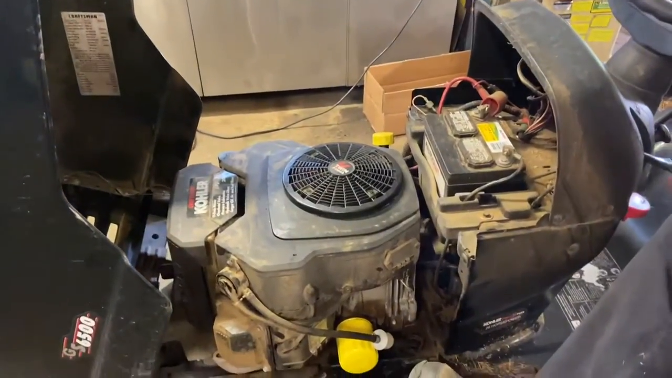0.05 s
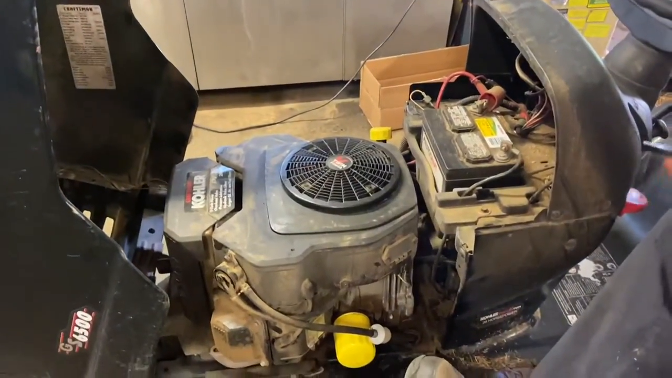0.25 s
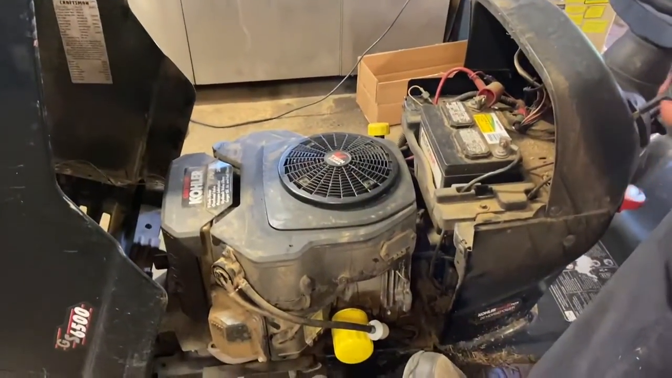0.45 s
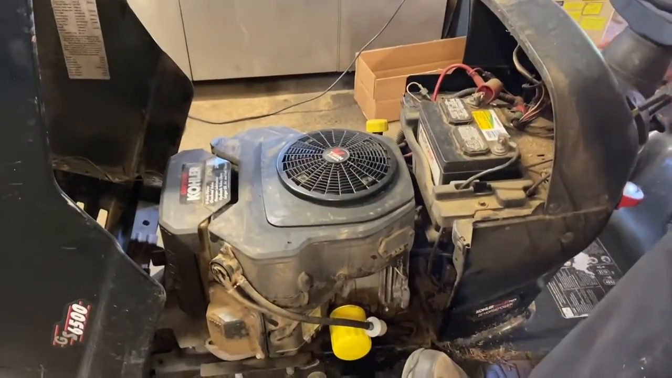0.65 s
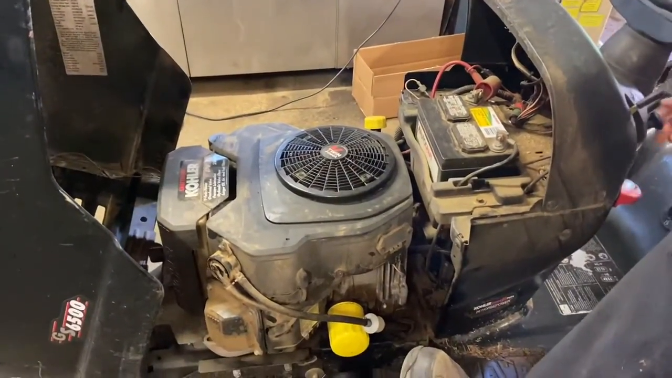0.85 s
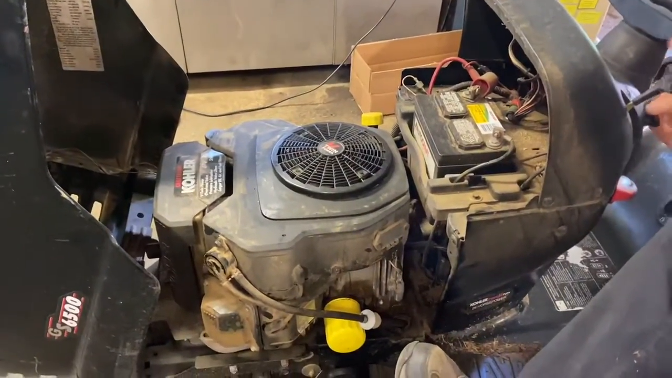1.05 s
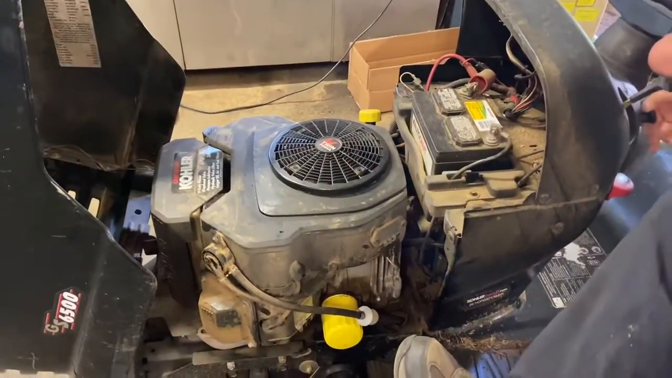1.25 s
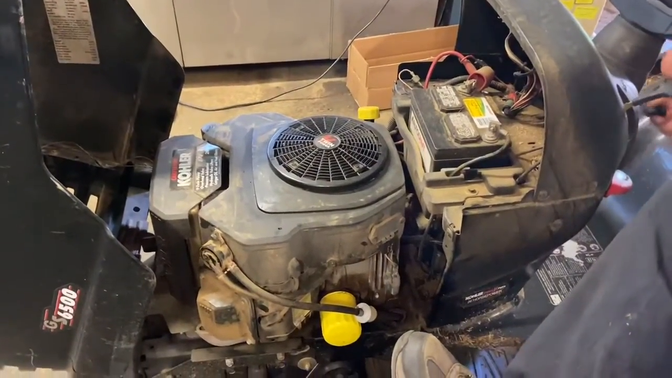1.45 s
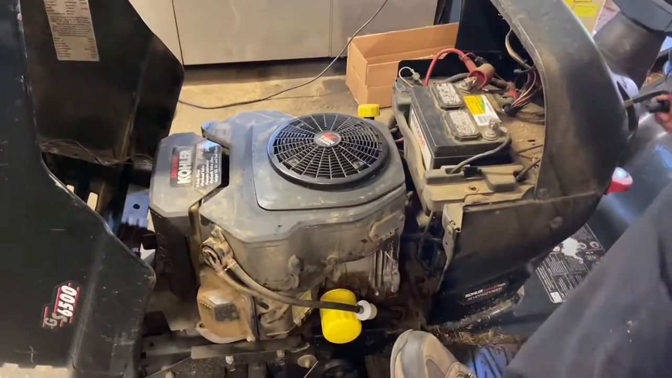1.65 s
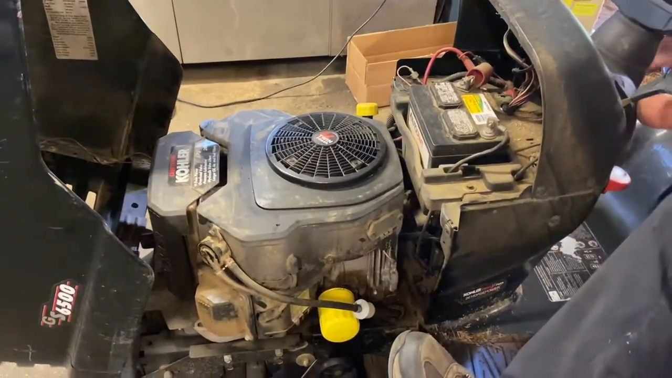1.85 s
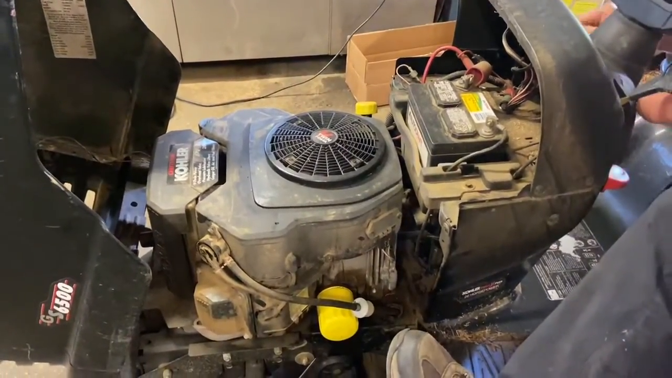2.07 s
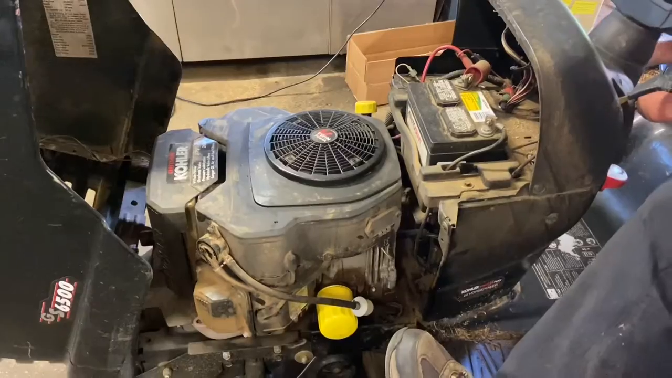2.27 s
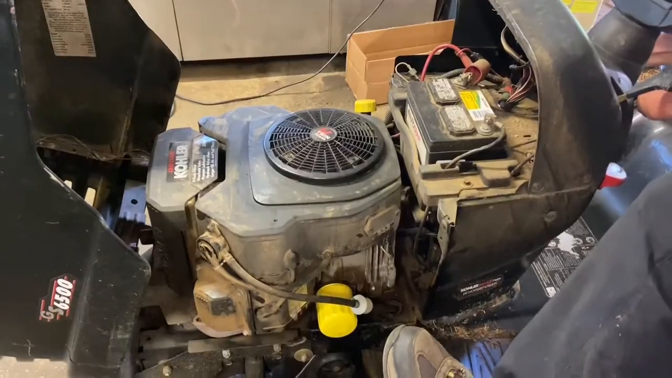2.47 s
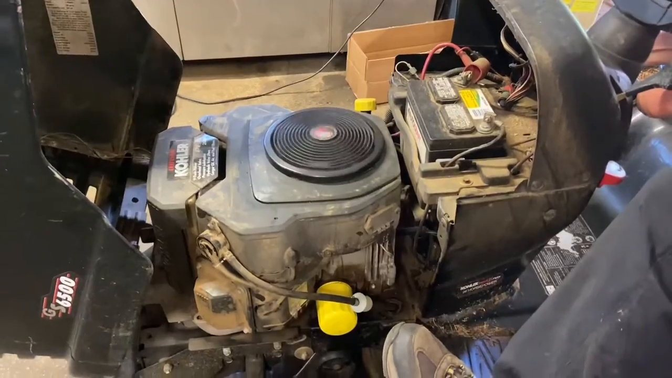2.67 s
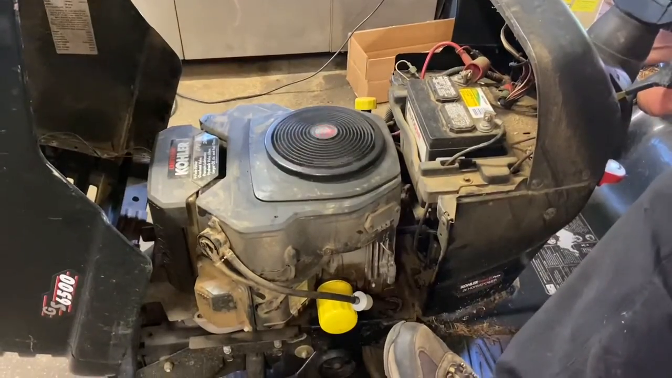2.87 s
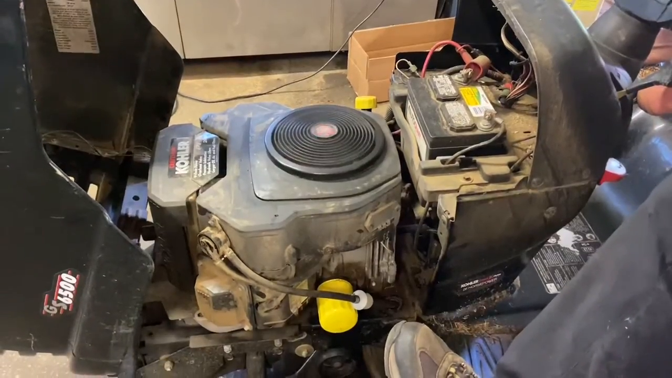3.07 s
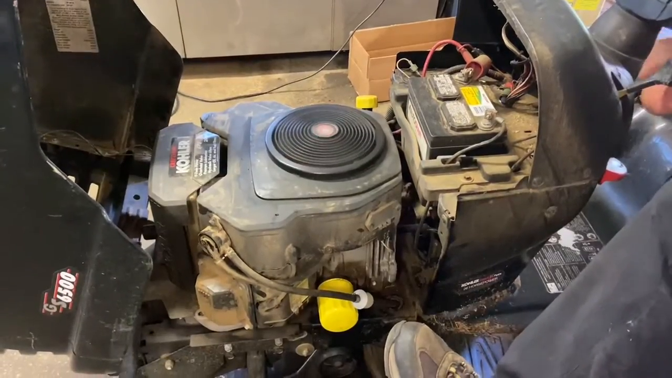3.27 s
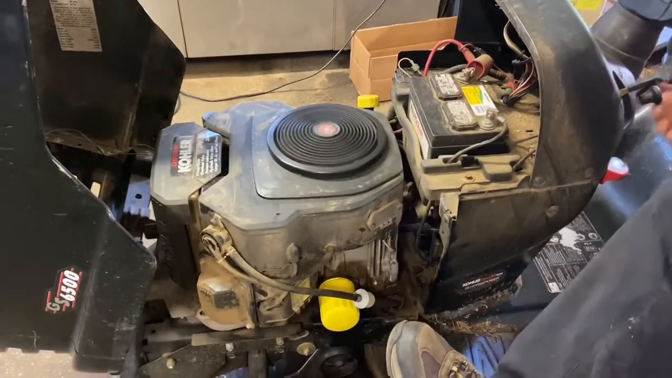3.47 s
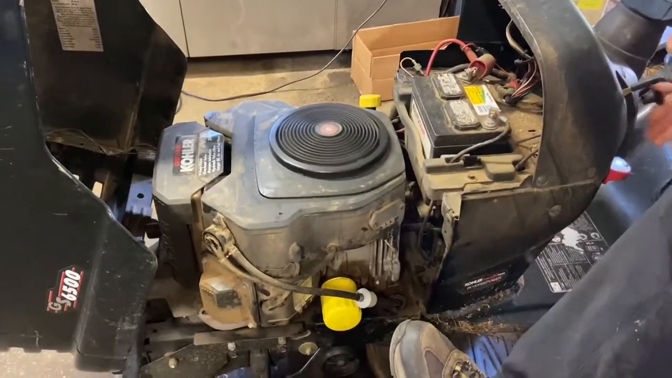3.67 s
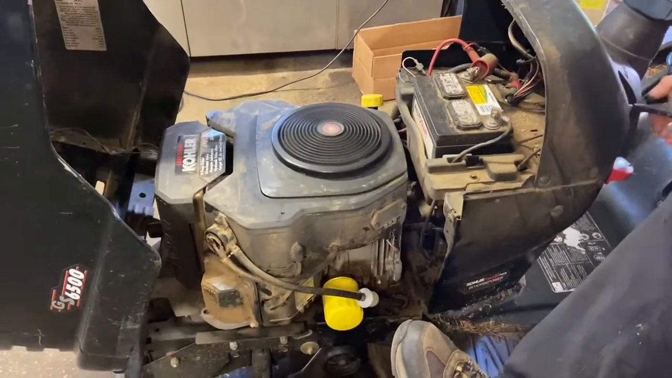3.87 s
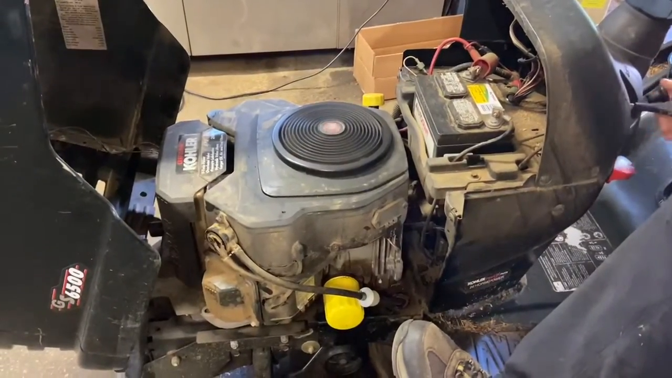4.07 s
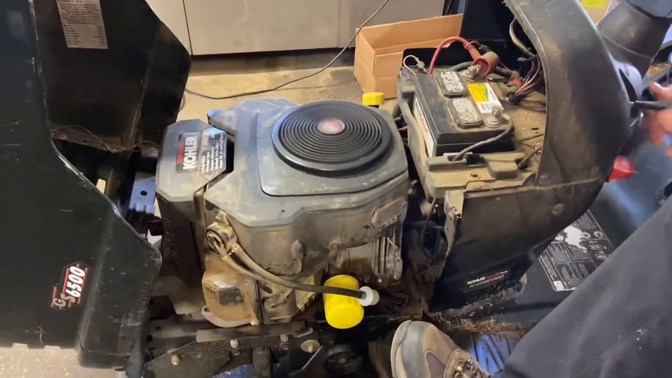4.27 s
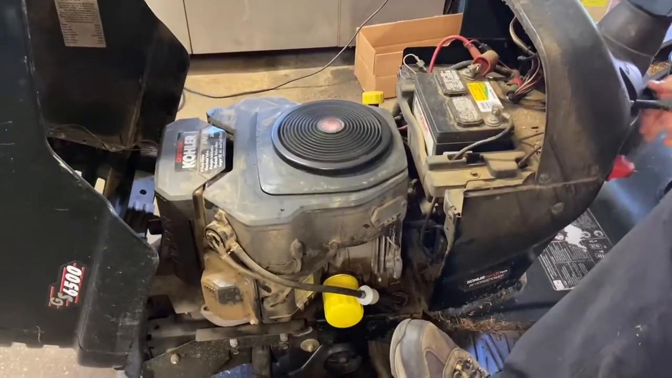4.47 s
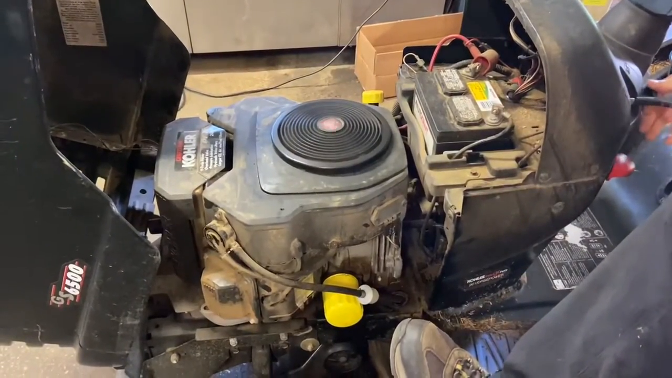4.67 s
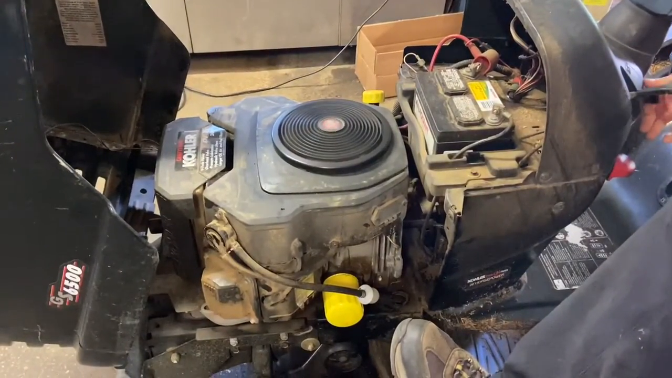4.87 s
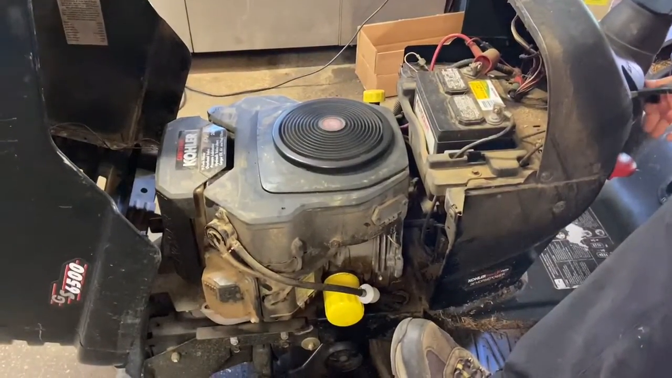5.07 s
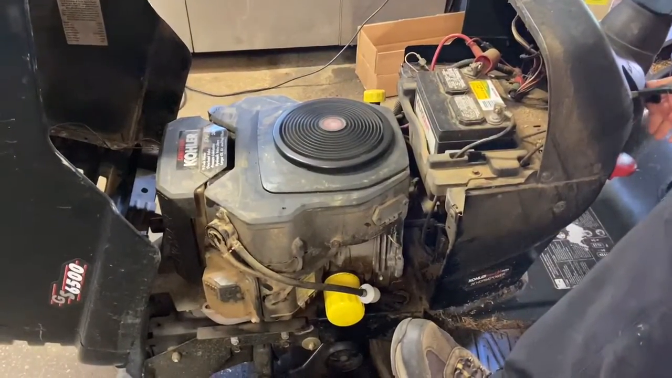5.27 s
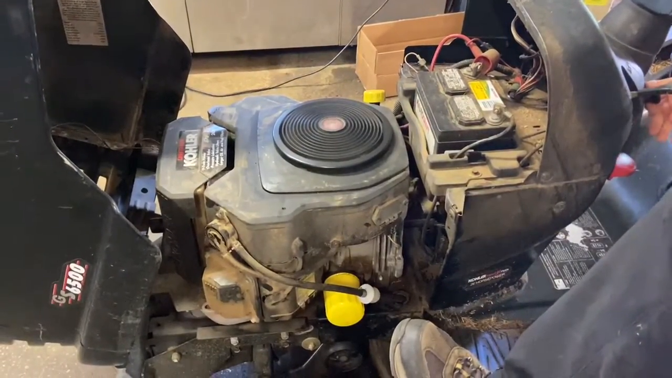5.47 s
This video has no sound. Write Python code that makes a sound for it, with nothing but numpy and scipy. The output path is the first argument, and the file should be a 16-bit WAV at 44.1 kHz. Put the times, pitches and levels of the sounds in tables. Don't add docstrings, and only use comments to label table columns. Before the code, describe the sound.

Stereo pickup a metre from a lawn tractor engine indoors. Pedal and key knocks come first over quiet room hum, then a violent clunk and harsh, heaving starter grind. The engine fires with a low howl and boom, backfires in a ragged burst, slows to dull puffs, then pops again and picks up to a fast uneven throb with rattling panels and hissing gas until the end.

```python
import sys
import numpy as np
from scipy import signal
from scipy.fft import rfft, irfft, next_fast_len
from scipy.io import wavfile
from scipy.ndimage import uniform_filter1d

SR = 44100
rng = np.random.default_rng(int(sys.argv[2]) if len(sys.argv) > 2 else 0)


def transcribe(signal):
    frames = np.atleast_2d(signal).T
    limited = np.clip(frames, -1, 1)
    pcm = np.round(limited * 32767).astype(np.int16)
    wavfile.write(sys.argv[1], SR, pcm)


def makeup_ratio(level_db):
    decades = np.asarray(level_db, float) / 20
    return 10 ** decades


N = 243431
T, M = np.arange(N) / SR, next_fast_len(N, True)
F = np.arange(M // 2 + 1) * SR / M

LEAD = .371
# (time [s], burn level [dB], labouring in the long pipe [dB])
EFFORT = [(2.92, -26, -39), (2.99, -25, -32), (3.17, -21.5, -36), (3.25, -23, -26), (3.4, -27, -30),
          (3.47, -28.5, -32), (3.71, -26.5, -19.5), (3.82, -26, -31), (4.05, -28.5, -36), (4.36, -33, -37),
          (4.55, -39, -31), (4.6, -25, -23.5), (4.72, -22, -26), (4.82, -18.5, -31), (4.92, -18.5, -42),
          (5.52, -17.5, -32)]
# (frequency [Hz], density [dB per Hz])
CLATTER = [(180, -3), (300, -6), (352, -13), (429, -13.5), (528, -8), (761, -7.5), (994, -9.5), (1330, -9),
           (2310, -14), (3200, -24.5), (4160, -25), (7040, -120)]
# (frequency [Hz], density [dB per Hz])
RUSH = [(2500, -25), (3200, -1.5), (5000, 3.5), (7000, 3), (9000, 3.5), (12000, 1.5), (15600, 2),
        (16000, -52)]


def engine():
    first_db, cold_db = -1, -2.5
    strokes = firings(first_db + cold_db * ((T > 3.2) & (T < 3.7)))
    puff = steady(fade_out(uniform_filter1d(strokes, SR // 60), 0.0021), 0.043)
    thumps, cracks = backfires()
    tailpipe = exhaust(strokes) + thumps
    block = chuffs() + cracks + howl(puff) + belt_whistle() + valve_train(puff)
    return tailpipe, block


def crank():
    # (time [s], position [cycles])
    crankshaft = [(2.40, -4.6), (2.693, -2.4), (2.976, 0), (3.061, 1), (3.186, 3), (3.289, 5), (3.701, 13),
                  (3.929, 17), (4.057, 19), (4.198, 21), (4.357, 23), (4.540, 25), (4.631, 26), (4.707, 27),
                  (4.823, 29), (4.9327, 31), (5.3215, 38), (5.706, 45)]
    cycles = np.interp(np.arange(N + SR // 8) / SR + .0015, *np.transpose(crankshaft))
    return uniform_filter1d(uniform_filter1d(cycles, SR // 16), SR // 16)[:N]


def firings(first_db):
    cycles = crank()
    scatter = makeup_ratio(.9 * rng.standard_normal(N))

    def stroke(lead):
        return np.diff(np.floor(cycles + lead), prepend=np.floor(cycles[0] + lead))

    return scatter * (stroke(0) + makeup_ratio(first_db) * stroke(LEAD))


def exhaust(strokes):
    # (frequency [Hz], width [Hz], gain [dB])
    boom_modes = [(58.5, 1.6, 25), (73.4, 32, 4), (83.3, 66, -15.5)]
    gate, burn_db, labour_db = curves(EFFORT, 0.017)
    echo = strokes + 0.48 * np.roll(strokes, int(0.027 * SR))
    echo = echo - .8 * np.roll(echo, SR // 300)
    boom = .45 * steady(band(ring(echo, boom_modes), 45, 96), .15)
    boom = boom + 1.15 * ring(drone(), [(76, 45, 0)])
    hot = makeup_ratio(0.9 * np.minimum(burn_db + 21, 0))
    beat = steady(pipe(np.roll(strokes, -int(.003 * SR)), hot), .25)
    soft = steady(band(strokes - np.roll(strokes, SR // 200), 84, 153), 0.078)
    soft_db = -14 - 1.23 * (burn_db + 22.5)
    return gate * (makeup_ratio(burn_db) * (makeup_ratio(1.5) * beat + makeup_ratio(soft_db) * soft) + makeup_ratio(labour_db) * boom)


def pipe(x, hot):
    # (frequency [Hz], width [Hz], gain [dB], sign [+1 or -1])
    chambers = [(72.4, 63, -14.8, 1), (82.6, 85, -14, -1), (93, 8, -23.6, 1), (165.8, 8, -23.4, 1),
                (222, 87, -26.4, 1), (256.5, 16, -25.8, -1), (290, 14, -38, 1), (326, 14, -35, -1)]
    out = 0
    for hz, width, db, sign in chambers:
        load = hot if 150 < hz < 230 else 1
        out = out + sign * load * ring(x, [(hz, width, db)])
    return out


def drone():
    # (order of the cycle [1], level [dB])
    orders = [(3, -10), (5, 0), (8, -14)]
    turn = 2 * np.pi * crank()
    lead = 2 * np.pi * LEAD
    return unit(sum(makeup_ratio(db) * (np.sin(round(k) * turn) + np.sin(round(k) * (turn + lead))) for k, db in orders))


def backfires():
    # (time [s], crack level [dB], thump level [dB])
    pops = [(3.2500, -14.5, -34), (3.2815, -14, -11.5), (3.3325, -13, -11), (3.3650, -13.5, -15),
            (3.3847, -14.5, -8), (3.4350, -44, -20), (3.4845, -9, -5), (3.5390, -25, -15),
            (3.5925, -12, -8), (3.6405, -10, -6), (3.6955, -11.5, -8), (4.5802, -24.5, -22),
            (4.615, -16, -27), (4.6644, -16, -39), (4.6870, -17.5, -28), (4.6975, -17, -13),
            (4.7550, -16.5, -24), (4.7960, -16.5, -23)]
    crack = impulses(pops, column=1)
    blow = np.roll(impulses(pops, column=2), int(.0035 * SR))
    swell = fade_out(uniform_filter1d(crack, SR // 160), 0.013)
    cracks = 0.34 * swell * (1.15 * noise(RUSH) + 1.44 * noise(CLATTER))
    thumps = 2600 * (pipe(blow, 0.45) - ring(blow, [(250, 17, -31)]))
    return thumps, cracks


def chuffs():
    # (time [s], level [dB])
    charges = [
        (2.685, -3),
        (2.792, -2),
        (2.922, -11),
    ]
    return band(ring(impulses(charges, column=1), [(73, 24, 31.6)]), 45, 144)


def valve_train(puff):
    # (frequency [Hz], width [Hz], gain [dB])
    shroud = [(428, 48, 9.5), (1335, 41, 9.5), (1657, 63, 4), (890, 84, 0.5), (1900, 120, -2),
              (2230, 470, -8.5)]
    valves = [(1, .2, .1), (4, .25, .3)]
    gate, burn_db, _ = curves(EFFORT, 0.017)
    cycles = crank()
    over = burn_db + 27
    octaves = np.log2(np.gradient(cycles) * SR / 18)
    clatter_db = -26.5 + 0.32 * over + 3.5 * octaves
    rush_db = -39 + 0.47 * over + 6 * octaves
    taps = unit(sum(makeup_ratio(3.8 * walk(14)) * ring(clicks(350, 2.3), [panel]) for panel in shroud))
    throb = 1 + sum(depth * np.cos(2 * np.pi * order * (cycles - place)) for order, depth, place in valves)
    clatter = unit(throb * (1 + 0.017 * puff) * makeup_ratio(0.31 * walk(25.12)) * (noise(CLATTER) + 0.63 * taps))
    rush = unit((1 + 0.5 * puff) * makeup_ratio(1.5 * walk(30)) * noise(RUSH))
    return gate * (makeup_ratio(clatter_db) * clatter + makeup_ratio(rush_db) * rush)


def howl(puff):
    # (time [s], pitch [Hz], level [dB])
    howl_catch = [(2.91, 165, -40), (2.935, 165, -22), (2.965, 200, -28), (3.0, 240, -29), (3.07, 238, -30),
                  (3.115, 250, -21), (3.17, 230, -29), (3.28, 252, -25), (3.33, 250, -40)]
    howl_recovery = [(4.58, 228, -43), (4.63, 230, -28), (4.665, 231.5, -23.5), (4.70, 237, -18),
                     (4.735, 250, -25), (4.76, 264, -26), (4.80, 272, -56)]
    # (time [s], pitch [Hz], level [dB])
    boom_catch = [(2.91, 62, -36), (2.94, 63, -23), (2.985, 66, -17), (3.02, 68, -25), (3.06, 75, -16),
                  (3.12, 77, -20), (3.17, 90, -17), (3.21, 92, -36)]
    boom_sag = [(3.88, 96.6, -40), (3.93, 89.4, -27), (4.0, 85, -25), (4.1, 77.7, -22.5), (4.2, 73, -22),
                (4.28, 68.6, -23), (4.36, 65, -32), (4.44, 62.5, -26), (4.56, 73, -29)]
    high = glide(howl_catch, 2.5, 0.47) + glide(howl_recovery, 2.34, .5)
    return (1 + 0.6 * puff) * high + glide(boom_catch, 1.0, .5) + glide(boom_sag, 0.97, .5)


def belt_whistle():
    # (time [s], pitch [Hz], level [dB])
    whistle = [(4.69, 5220, -56), (4.715, 5220, -40), (4.786, 5150, -46), (4.82, 5150, -38),
               (4.84, 5170, -41), (4.92, 5228, -49)]
    return 1.2 * glide(whistle, 28, 3)


def starter():
    # (frequency [Hz], density [dB per Hz])
    grind_colour = [(88, -9), (150, -13), (288, -13), (382, -4), (493, -14), (568, -6), (1080, -11.5),
                    (1410, -6), (1580, -3), (3200, -27.5), (4160, -47), (7040, -120)]
    sizzle_colour = [(2500, 3.5), (3300, -13.5), (5000, 0.5), (6600, 1.5), (8200, 2.5), (11000, -9),
                     (15600, -7), (16000, -45)]
    # (frequency [Hz], width [Hz], gain [dB])
    ring_gear = [(738, 72, -9.5), (907, 48, -3), (1420, 100, 8), (2086, 32, -4.5), (2820, 90, -31)]
    pinion = [(3610, 980, 13), (4680, 56, -7.5), (6400, 51, 20.5), (6940, 43, -11), (6950, 59, -11),
              (7700, 180, -14), (8150, 38, -9)]
    # (time [s], grind level [dB], sizzle level [dB], held [s])
    surges = [(2.379, -27, -27.5, 0.0071), (2.412, -11, -12.5, 0.0032), (2.434, -35, -40, 0.0038),
              (2.467, -29, -52, 0.011), (2.492, -24, -37, 0.0051), (2.513, -24.5, -32, 0.016),
              (2.545, -24.5, -26, 0.0083), (2.566, -16, -35, 0.03), (2.655, -25, -33.5, 0.036),
              (2.684, -38, -45, 0.0075), (2.709, -24.5, -53, 0.007), (2.735, -31, -49, 0.01),
              (2.785, -23.5, -37, .008), (2.816, -32, -27, 0.0067), (2.856, -22, -38, 0.04),
              (2.934, -26, -21, 0.035), (2.999, -28.5, -20, 0.033), (3.074, -24, -22, 0.0067),
              (3.125, -20.5, -22, 0.023), (3.183, -13.5, -23.5, 0.0065)]
    # (time [s], pitch [Hz], level [dB])
    groans = [
        [(2.69, 720, -31), (2.705, 644, -25), (2.72, 566, -23), (2.75, 560, -31), (2.79, 704, -29),
         (2.82, 720, -36)],
        [(2.845, 700, -34), (2.86, 760, -23), (2.875, 890, -19), (2.89, 900, -32)],
        [(2.92, 762, -36), (2.945, 737, -25), (2.97, 744, -32)],
    ]
    on, off, full_spin = 2.378, 3.205, 3.02
    rise, fall = 0.0077, 0.0065
    gate = np.clip(np.minimum(T - on, off - T) / .01 + 1, 0, 1)
    grind_gain = makeup_ratio(np.interp(T, [on, full_spin], [-23.5, -26]))
    sizzle_gain = makeup_ratio(np.interp(T, [on, full_spin], [-39, -19.5]))
    mesh_gain = 0.4 * grind_gain
    for s, grind_db, sizzle_db, held in surges:
        span = slice(int((s - rise) * SR), int(s * SR) + SR // 4)
        after = T[span] - s
        surge = np.clip(after / rise + 1, 0, 1) * np.exp(-np.maximum(after - held, 0) / fall)
        grind_gain[span] += 0.72 * makeup_ratio(grind_db) * surge
        mesh_gain[span] += 0.69 * 2.2 * makeup_ratio(grind_db) * surge
        sizzle_gain[span] += makeup_ratio(sizzle_db) * surge
    teeth = clicks(1500, 2.15)
    chatter = makeup_ratio(1.3 * walk(60))
    grind = chatter * noise(grind_colour)
    mesh = chatter * unit(band(ring(teeth, ring_gear), 590, 5200))
    flicker = makeup_ratio(1.8 * walk(70))
    sizzle = unit(chatter * flicker * (noise(sizzle_colour) + 0.44 * unit(ring(teeth, pinion))))
    cycles = crank()
    turns = cycles + 0.206 / (2 * np.pi) * np.sin(2 * np.pi * cycles)
    whirr = makeup_ratio(-7.5) * walk(43) * np.sin(2 * np.pi * 61 * turns)
    rasp = grind_gain * 0.73 * (band(grind, 98, 7500) + whirr)
    groan = sum(glide(g, 13.7, 2.5) for g in groans)
    return gate * (rasp + 0.7 * mesh_gain * mesh + sizzle_gain * sizzle) + groan


def knocks():
    # (time [s], peak [dB], ring [Hz], low body
    # [dB], bright [dB])
    sharp = [(0.122, -39, 1550, -24, -2), (0.137, -27.5, 1340, -16.5, -4), (0.278, -36.5, 780, -7, 6),
             (0.31, -20.5, 1000, -9, -2.5), (0.4949, -21, 1150, -13, -37), (0.509, -33, 1200, 4, -28),
             (1.094, -35.5, 1390, -10, -20), (2.218, -43, 1560, -11, -22), (1.285, -34, 1290, -6, -23),
             (1.345, -35, 1420, 5, -5), (1.357, -34, 1440, -7, -18), (1.381, -28.5, 738, -6, -1),
             (1.444, -30.5, 850, -10, -14), (1.821, -33, 1370, -4, -27), (1.829, -35.5, 1140, 0, -32),
             (1.893, -42.5, 700, 8, -30), (0.95, -44, 1200, -2, -14), (2.05, -43, 1610, 8, -25),
             (2.252, -47, 1800, -5, -8), (2.276, -25.5, 1530, -4.5, -12), (2.308, -25, 1150, -2, -15),
             (2.339, -37, 900, -13, 5), (2.352, -42, 900, -10, -5), (2.381, -5.5, 1530, -12.5, -23),
             (2.409, -11, 1420, -1, 6.5), (2.413, -3, 890, -15.5, -30), (0.321, -29.5, 760, -2, -7)]
    # (time [s], peak [dB], ring [Hz], low body [dB], bright [dB])
    scuffs = [(0.25, -40.5, 1250, -12, -20), (0.423, -40.5, 1600, 2.5, -24), (0.487, -38, 1300, -9, -15),
              (0.943, -39.5, 1230, 0, -9), (0.965, -43.5, 1300, -5, -24), (1.051, -48, 1350, -13, -20),
              (1.111, -45.5, 1530, 4, -22), (1.19, -48.5, 1280, 3, -22), (1.373, -30, 625, -24, -6),
              (1.57, -42.5, 1170, -6, -35), (1.624, -45, 1080, 6.5, -23), (1.792, -44.5, 900, 1.5, -20),
              (1.905, -34.5, 1900, -9, -18), (1.955, -35.5, 1260, -9, -32), (1.455, -38.5, 1130, -3, -22),
              (2.039, -47.5, 1560, 5.5, -27), (2.264, -22.5, 676, -2, -30), (2.27, -38, 1790, -12, -18),
              (2.305, -40, 1800, -13, -17)]
    # (time [s], peak [dB], ring [Hz])
    clunks = [(2.564, -21, 1430), (2.586, -14, 1300), (2.603, -27, 1450), (2.700, -13, 640),
              (2.712, -10, 560), (2.871, -20, 850), (2.7833, -4, 1430), (2.854, -10, 1330),
              (2.865, -10, 1350), (2.88, -13, 1300), (2.812, -12, 1320), (2.655, -15, 1500),
              (2.663, -13, 1600), (2.9, -18, 360), (2.381, -10.5, 3800), (2.596, -17, 1550),
              (3.4, -13, 1360)]
    # (frequency [Hz], density [dB per Hz])
    edge_colour = [(2500, -22), (3500, -31), (5000, 11.5), (6200, 6), (7500, 11), (12000, 4), (15600, 0),
                   (16000, -52)]
    # (frequency [Hz], width [Hz], gain [dB])
    loose_parts = [(1600, 70, -2), (1800, 67, -10), (2350, 16, -1), (2950, 62, -9), (4400, 50, -11),
                   (5500, 36, -5)]
    out, bright = np.zeros(N), noise(edge_colour)
    t = np.arange(SR // 6) / SR
    # rise [s], fall [s], size of the first contact
    rows = [tuple(r) + (0.0026, 0.0096, 3.2) for r in sharp]
    rows += [tuple(r) + (0.0072, 0.03, 0.3) for r in scuffs]
    rows += [tuple(r) + (-29, -33) + (0.002, 0.0085, 5.6) for r in clunks]
    for s, db, hz, body_db, bright_db, rise, fall, contact in rows:
        i = int(s * SR)
        burst = np.minimum(t / max(rise, .0005), 1) * np.exp(-t / max(fall, .002))
        shift = 1 + 0.066 * rng.standard_normal()
        rough = np.repeat(rng.standard_normal(len(t) // 100 + 1), 100)[:len(t)]
        shake = burst * rng.standard_normal(len(t)) * makeup_ratio(3.0 * rough)
        shake[SR // 500] += contact
        tin = ring(shake, [(hz, 170, 2), (1.165 * hz, 220, -3), (0.718 * hz, 150, -2),
                           (1.73 * hz, 300, -10), (1500, 1800, -25)])
        hollow = ring(np.roll(shake, SR // 160), [(325, 220, 0)])
        body = ring(hollow, [(270 * shift, 50, -1), (385 * shift, 45, -1), (760 * shift, 110, -7)])
        keys = ring(shake, [(f * shift ** 0.32, w / 2, g + 4 * rng.standard_normal()) for f, w, g in loose_parts])
        hit = tin / np.abs(tin).max()
        hit = hit + makeup_ratio(-20.5 + 0.88 * (bright_db + 8)) * keys / np.abs(keys).max()
        hit = hit + makeup_ratio(body_db) * body / np.abs(body).max()
        hit = hit + 0.36 * makeup_ratio(bright_db) * burst * bright[i:i + len(t)]
        out[i:i + len(t)] += 0.91 * makeup_ratio(db) * hit
    return out


def shop():
    # (frequency [Hz], density [dB per Hz])
    hum_colour = [(15, -73), (25, -28), (38, -11), (59, -1.5), (127, -15), (161, -12.5), (180, -13.5),
                  (384, -20.5), (545, -25), (734, -25), (2840, -49.5), (6920, -53.5), (9320, -53),
                  (11000, -45), (16000, -56)]
    duck = np.interp(T, [2.37, 2.45], [0, -13])
    waver = 1.2 * walk(6)
    return makeup_ratio(-49 + duck + waver) * noise(hum_colour)


def unit(x):
    return x / np.sqrt(np.mean(x ** 2))


def on_log(points):
    hz, value = np.transpose(points)
    return np.interp(np.log(F + 1), np.log(hz), value)


def noise(spectrum):
    return unit(irfft(rfft(rng.standard_normal(M)) * makeup_ratio(on_log(spectrum)), M)[:N])


def ring(x, modes):
    return sum(makeup_ratio(db) * signal.lfilter(*signal.iirpeak(hz, hz / width, SR), x) for hz, width, db in modes)


def band(x, lo_hz, hi_hz):
    return signal.sosfiltfilt(signal.butter(2, [lo_hz, hi_hz], "bandpass", fs=SR, output="sos"), x)


def curves(table, fade):
    s, *columns = np.transpose(table)
    gate = np.clip(np.minimum(T - s[0], s[-1] - T) / fade + 1, 0, 1)
    return [gate] + [np.interp(T, s, c) for c in columns]


def walk(rate):
    k = int(SR / rate)
    return uniform_filter1d(np.repeat(rng.standard_normal(N // k + 1), k), k)[:N]


def clicks(rate, spread_db):
    chance = rng.random((2, N))
    size = makeup_ratio(-spread_db * np.log(1 - chance[1]))
    sign = np.sign(chance[1] * 64 % 1 - .5)
    return (chance[0] < rate / SR) * size * sign


def fade_out(x, seconds):
    return signal.lfilter([1], [1, -np.exp(-1 / (seconds * SR))], x)


def steady(x, seconds):
    return x / np.sqrt(uniform_filter1d(x ** 2, int(seconds * SR)) + 1e-4 * np.mean(x ** 2))


def impulses(rows, column):
    out = np.zeros(N)
    out[[int(r[0] * SR) for r in rows]] = makeup_ratio(np.array([r[column] for r in rows]))
    return out


def glide(table, waver_hz, flutter_db):
    gate, hz, db = curves(table, 0.009)
    phase = 2 * np.pi * np.cumsum(hz + waver_hz * walk(60)) / SR
    return gate * makeup_ratio(db + flutter_db * walk(40)) * np.sin(phase)


def heard():
    t60 = .33
    tailpipe, block = engine()
    mic_low = signal.butter(3, 43.2, "highpass", fs=SR, output="sos")
    direct = signal.sosfilt(mic_low, block + starter() + knocks())
    t = np.arange(int(t60 * SR)) / SR
    cloud = (t > .01) * rng.standard_normal(len(t)) * makeup_ratio(-60 * t / t60)
    walls = signal.fftconvolve(direct, cloud / np.sqrt(np.sum(cloud ** 2)))[:N]
    walls = signal.sosfilt(signal.butter(1, [250, 4630], "bandpass", fs=SR, output="sos"), walls)
    return 0.98 * direct + band(tailpipe, 41, 1100) + makeup_ratio(-5.5) * walls + shop()


def scene():
    # (frequency [Hz], +1 same to -1 opposite [1])
    likeness = [(60, 0.99), (125, 0.99), (250, 0.95), (500, 0.73), (1200, 0.66), (2500, 0.26), (4200, 0.39),
                (5500, 0.086), (6900, 0.78),
                (7500, .5), (8450, -1), (9400, -1), (10600, 1), (11500, 1), (12700, -1), (13600, -1),
                    (14800, 1)]
    # (frequency [Hz], left minus right [dB])
    shadow_table = [(300, 0), (1900, -1.4), (2700, -0.5), (4400, 4), (6000, 0.5), (8000, 1)]
    alike = np.clip(on_log(likeness), -1, 1)
    shadow = on_log(shadow_table) / 2
    mid = rfft(heard(), M) * np.sqrt((1 + alike) / 2)
    side = 1j * rfft(heard(), M) * np.sqrt((1 - alike) / 2)
    return irfft(np.array([(mid + side) * makeup_ratio(shadow), (mid - side) * makeup_ratio(-shadow)]), M)[:, :N]


def low_pass(x):
    return signal.sosfilt(signal.butter(12, 17000, fs=SR, output="sos"), x)


def record(dry):
    # (frequency [Hz], phase [rad])
    port_phase = [(0, 0), (400, .1), (1700, .7), (3200, .6), (6500, .2), (7200, 0)]
    lead = np.interp(F, *np.transpose(port_phase)) / 2
    ports = irfft(rfft(dry, M) * np.exp(1j * np.array([lead, -lead])), M)[:, :N]
    cut = signal.ellip(8, .2, 60, 15900, fs=SR, output="sos")
    mix = signal.sosfilt(cut, 1.03 * np.tanh(ports / 1.144))
    return low_pass(mix)


dry = scene()
out = record(dry)
transcribe(out)
```